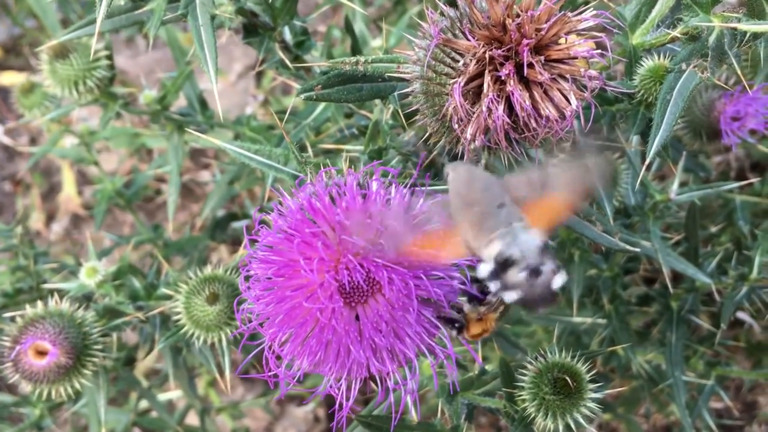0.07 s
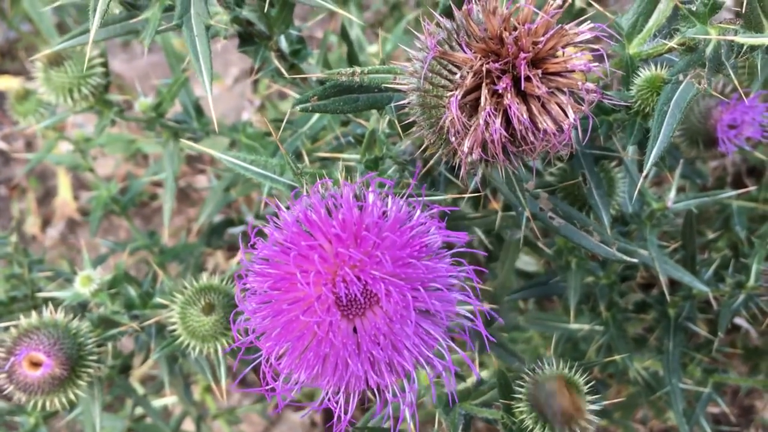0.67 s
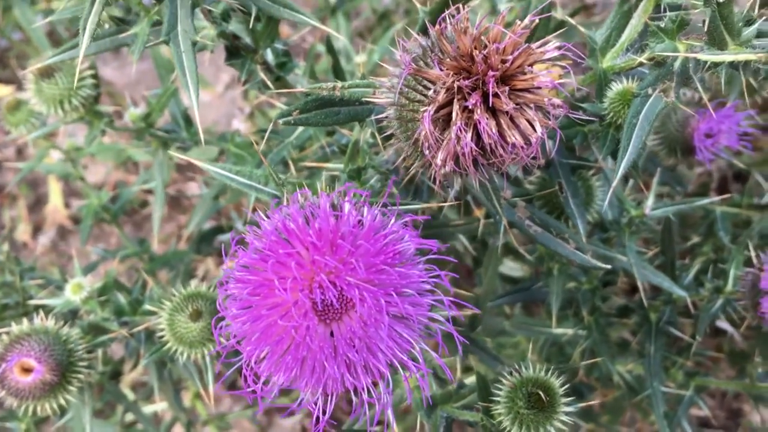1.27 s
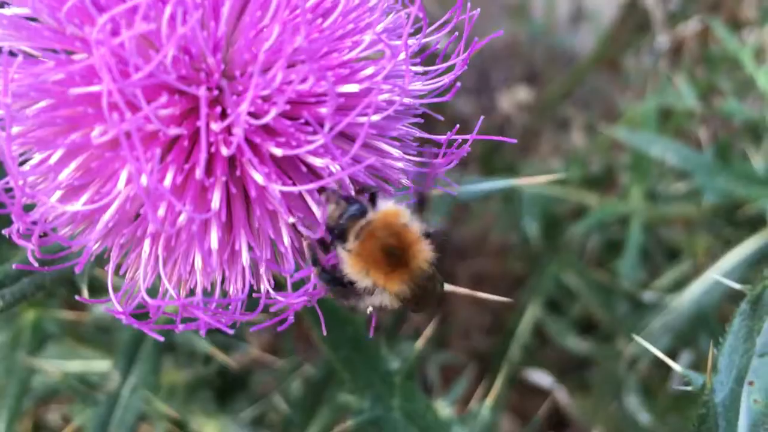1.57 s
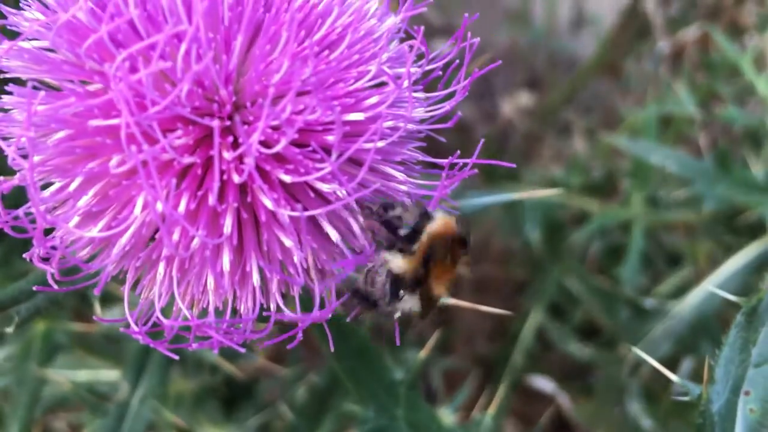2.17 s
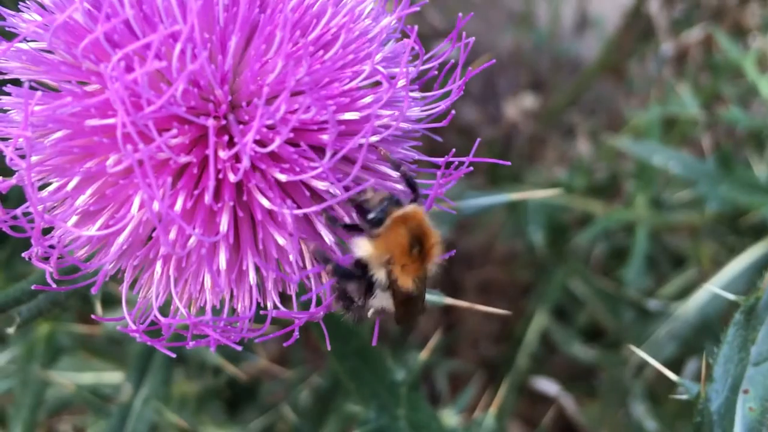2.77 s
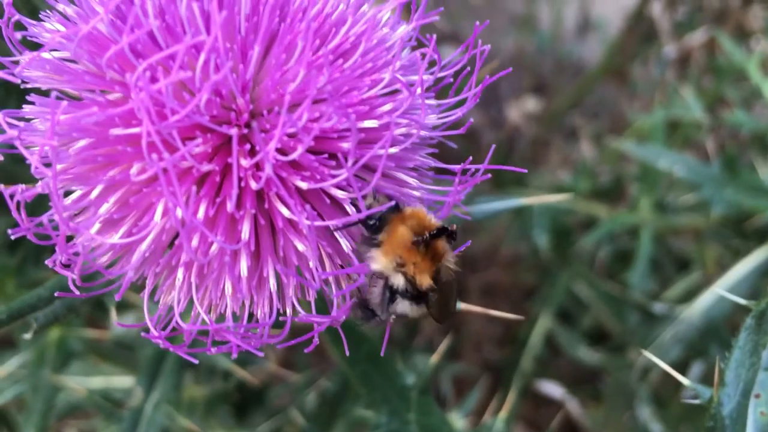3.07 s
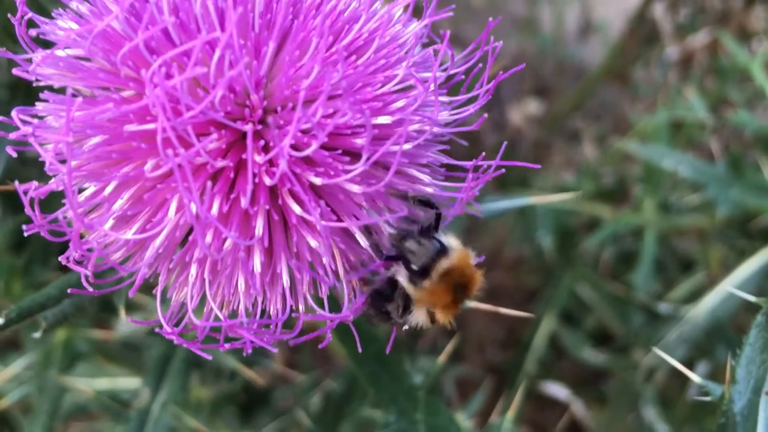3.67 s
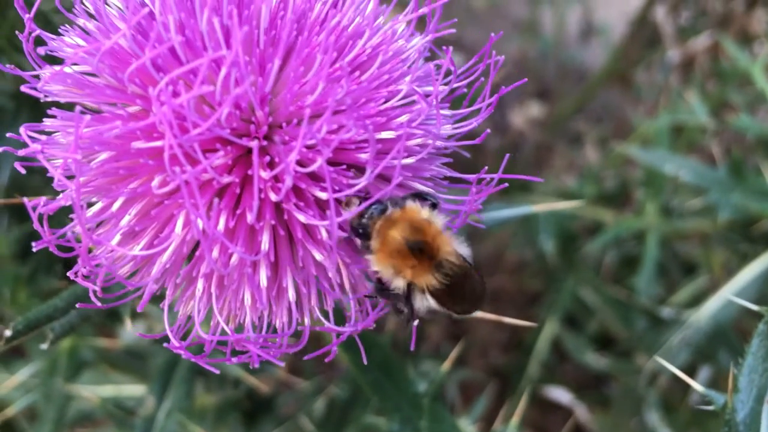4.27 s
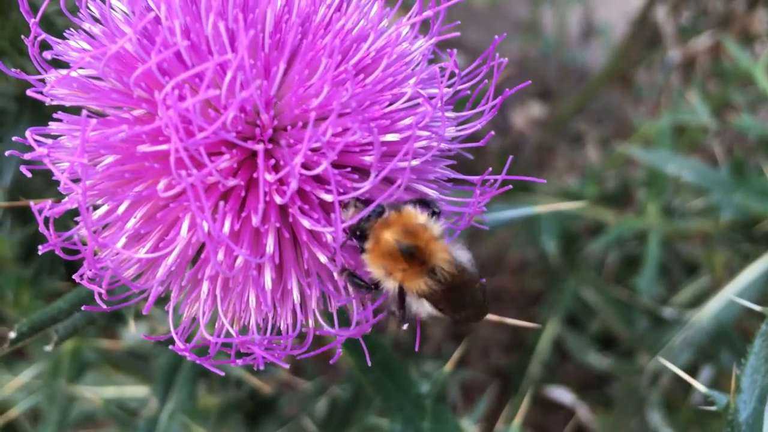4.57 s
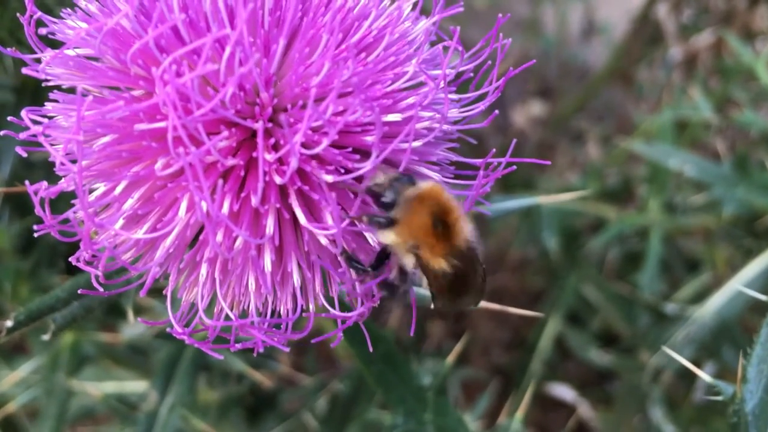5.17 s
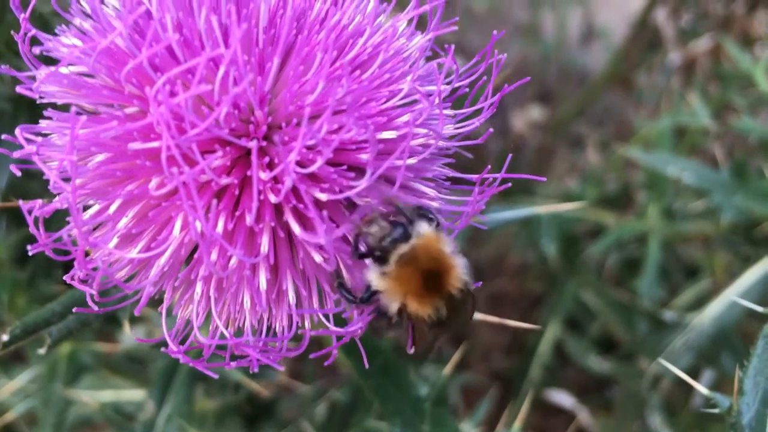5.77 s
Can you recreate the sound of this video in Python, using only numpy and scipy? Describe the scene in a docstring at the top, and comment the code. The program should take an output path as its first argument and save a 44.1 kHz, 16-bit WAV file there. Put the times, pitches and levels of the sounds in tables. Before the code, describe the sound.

Low, fluttering wingbeats of a hovering moth fade away, leaving bees humming and buzzing by, with thin, distant bird whistles.

```python
"""Wings throb and tick close by: a hawk moth hovers at a thistle, brushes the dry plant and leaves.
Each wing stroke pushes a pulse of air. A bee buzzes past, another comes near at the end,
and more hum among the flowers, their wingbeats drifting in and out of step.
A small bird whistles thinly far off over faint outdoor air, and very high ticks come now and then.
The sound drops out once for an instant."""
import sys
import numpy as np
from scipy import signal
from scipy.fft import rfft, irfft, next_fast_len
from scipy.io import wavfile
from scipy.ndimage import uniform_filter1d

SR = 44100
rng = np.random.default_rng(int(sys.argv[2]) if len(sys.argv) > 2 else 0)


def put_to_file(sound):
    """Save the sound as 16-bit audio at rate SR, in the file named by the first command-line argument."""
    columns = np.atleast_2d(sound).T  # one column per channel
    safe = np.clip(columns, -1, 1)
    whole_steps = np.round(safe * 32767)
    wavfile.write(sys.argv[1], SR, whole_steps.astype(np.int16))


N = 260631
TIME = np.arange(N) / SR
DROPOUT_START_S, DROPOUT_END_S = 1.5825, 1.607


def from_db(db):
    """Turn decibels (dB) into a number to multiply a sound by."""
    return 10 ** (np.asarray(db) / 20)


def unit(x):
    """Scale a signal so that its average strength (rms) is 1."""
    return x / np.sqrt(np.mean(x ** 2))


def curves(table):
    """Join a table's rows with straight lines in time: one curve for each column after the first."""
    times, *columns = np.transpose(table)
    return [np.interp(TIME, times, column) for column in columns]


def bell(peak_s, width_s):
    """A smooth rise to 1 and back."""
    return np.exp(-((TIME - peak_s) / width_s) ** 2)


def wander(rate):
    """A smooth random wobble of strength 1, drawn from `rate` new values a second."""
    held = np.repeat(rng.standard_normal(int(rate * N / SR) + 3), 8)
    smooth = uniform_filter1d(uniform_filter1d(held, size=8), size=8)
    return np.interp(TIME * rate, np.arange(len(smooth)) / 8, unit(smooth))


def colour(x, points):
    """Make some frequencies stronger and others weaker; white noise keeps its overall power."""
    hz, db = np.transpose(points)
    size = next_fast_len(N + SR // 10, real=True)
    log_hz = np.log(np.fft.rfftfreq(size, 1 / SR) + 1)
    gain = from_db(np.interp(log_hz, np.log(hz), db))
    return irfft(rfft(x, size) * unit(gain), size)[:N]


def noise(points):
    """Coloured noise of strength about 1."""
    return colour(rng.standard_normal(N), points)


def phase_of(hz):
    """How far a changing pitch has turned through its cycles, in radians."""
    return 2 * np.pi * np.cumsum(hz) / SR


def tone(phase):
    """A pure tone of strength 1."""
    return np.sqrt(2) * np.cos(phase)


def bursts(events, decay_s):
    """Noise that jumps up at each event and dies away."""
    envelope = np.zeros(N)
    for start_s, db in events:
        start = int(start_s * SR)
        envelope[start:] += from_db(db) * np.exp(-TIME[:N - start] / decay_s)
    return envelope * rng.standard_normal(N)


def air(rumble_db=-71, hiss_db=-84):
    """Outdoor air rumbles faintly, swaying in level, under an even hiss."""
    # The colours of the two noises. Each row: frequency in Hz, relative level in dB.
    rumble_colour = [(20, -19), (35, -7), (60, 3.5), (110, -3.5), (190, -9.5), (260, -4), (450, -6.5),
                     (800, -14), (1300, -14), (2000, -17.5), (3700, -19.5), (4900, -27), (5600, -23.5),
                     (10400, -26)]
    hiss_colour = [(9000, -23), (10500, -36), (11300, 8.5), (16000, 5.5)]
    rumble = from_db(rumble_db + 0.66 * wander(4.45)) * noise(rumble_colour)
    return rumble + from_db(hiss_db) * noise(hiss_colour)


def high_ticks(gain_db=-5):
    """Faint, very high ticks come now and then, perhaps from insects."""
    # Each row: start in seconds, relative level in dB.
    tick_events = [(1.708, -53), (2.1256, -60), (3.7249, -56), (3.858, -60), (4.133, -61)]
    # Each row: frequency in Hz, relative level in dB.
    tick_colour = [(3000, -33), (9500, -21), (11500, 5), (14000, 9), (16000, 4)]
    return colour(from_db(gain_db) * bursts(tick_events, decay_s=0.002), tick_colour)


def bird(warble=0.01, echo_decay_s=0.031, gain_db=-3):
    """A far bird's thin, sliding whistles are smeared as they scatter among the plants."""
    # Each row: start and length in seconds, first and last pitch in Hz, relative level in dB.
    notes = [(1.15, 0.13, 7540, 7900, -88), (1.52, 0.069, 8500, 8510, -73.5), (1.534, .06, 7520, 7570, -86),
             (2.418, 0.12, 8750, 8750, -90), (2.841, .13, 8540, 8050, -85), (3.537, 0.16, 8430, 8400, -76),
             (3.57, 0.11, 7480, 7250, -82), (3.908, 0.067, 8640, 7940, -77),
             (3.934, 0.094, 8160, 7960, -78), (4.307, .05, 8100, 7640, -79.5), (4.34, 0.2, 7800, 7830, -88)]
    song = np.zeros(N)
    for start, length, first_hz, last_hz, db in notes:
        progress = np.clip((TIME - start) / length, 0, 1)
        hz = (first_hz + (last_hz - first_hz) * progress) * (1 + warble * wander(250))
        song += from_db(db) * np.sqrt(4 * progress * (1 - progress)) * tone(phase_of(hz))
    tail = rng.standard_normal(SR // 2) * np.exp(-TIME[:SR // 2] / echo_decay_s)
    echo = signal.fftconvolve(song, tail / np.linalg.norm(tail))[:N]
    # the dropout cuts off a call and its echo
    heard = (TIME < DROPOUT_START_S) | (TIME > DROPOUT_END_S + 0.5)
    return from_db(gain_db) * (song + echo) * heard


def distant_buzz(buzz_db=-58.5, drift=0.012):
    """The overtones of distant bees spread apart above their hum, over a faint steady drone."""
    # The wingbeat of each bee in Hz.
    wingbeats = [168, 173.4, 174.6, 179.6]
    # Each row: multiple of the wingbeat, relative level in dB.
    overtones = [(2, -23), (3, -26), (4, -27.5), (5, -36.5), (6, -32.5), (7, -33.5), (8, -38), (9, -38),
                 (10, -35.5)]
    # Each row: pitch in Hz, level in dB.
    drone_tones = [(100, -89), (314, -84), (942, -92.5), (1256, -91)]
    buzz, drone = 0, 0
    for hz in wingbeats:
        phase = phase_of(hz * (1 + drift * wander(5) + 0.00498 * wander(50)))
        buzz += sum(from_db(db + 3.8 * wander(9)) * tone(k * phase) for k, db in overtones)
    for hz, db in drone_tones:
        drone += from_db(db + 4 * wander(4.9)) * tone(phase_of(hz * (1 + 0.004 * wander(10))))
    return from_db(buzz_db) * buzz / np.sqrt(len(wingbeats)) + drone


def distant_hum(swell_gain_db=-0.5, swell_edge_s=0.014, murmur_db=-70, drift=0.01517):
    """The wingbeats of distant bees pulse against each other and swell into one tone when in step."""
    # The wingbeat of each bee in Hz.
    wingbeats = [153.6, 159.3, 163.1, 165.6, 170.9]
    # The pulsing hum. Each row: time in seconds, level in dB.
    hum_levels = [(0, -53.5), (.8, -54), (1.7, -61.5), (2.7, -61), (4.6, -59), (5.9, -62.5)]
    # Moments in step. Each row: start and length in seconds, relative level in dB, wingbeat in Hz.
    swell_events = [(1.049, 0.087, -52, 162.9), (1.188, 0.16, -51.5, 160.4), (1.4, 0.042, -51, 165.3),
                    (1.479, 0.023, -53.5, 154.7), (1.78, 0.044, -53, 165.7), (1.91, 0.032, -54, 160.3),
                    (2.293, 0.056, -53, 161.3), (2.969, 0.024, -55, 159.1), (3.094, 0.04, -52.5, 168.7),
                    (3.153, 0.072, -50, 164.6), (3.355, 0.031, -53, 162), (3.869, 0.05, -52.5, 161.8),
                    (4.14, 0.052, -50, 162.3), (4.38, 0.053, -52, 163), (4.484, 0.025, -54.5, 164.8),
                    (4.55, 0.03, -54.5, 169), (4.815, 0.03, -55, 168.2), (4.903, 0.026, -53.5, 168.0),
                    (5.159, 0.057, -51, 166.6), (5.545, 0.027, -54.5, 163.4)]
    # The blur of the farthest bees. Each row: frequency in Hz, relative level in dB.
    murmur_colour = [(90, -30), (135, -7.5), (155, -8), (185, -0.5), (205, -7.5), (240, -19.5), (400, -48),
                     (1000, -70)]
    chorus = sum(tone(phase_of(hz * (1 + drift * wander(6)))) for hz in wingbeats)
    pulsing = from_db(curves(hum_levels)[0]) * unit(chorus)
    swells, in_step = 0, 0
    for start, length, db, hz in swell_events:
        shape = bell(start + length / 2, length / 2 + swell_edge_s)
        phase = 2 * np.pi * hz * TIME + rng.uniform(0, 2 * np.pi)
        swells += from_db(db + swell_gain_db) * shape * tone(phase)
        in_step = np.maximum(in_step, shape)
    return (1 - in_step) * pulsing + swells + from_db(murmur_db) * noise(murmur_colour)


def bee(flight, harmonics, low_tone_db, rasp_db, wash_db, flutter_db, jitter, swerve_jitter, blur):
    """Wings make harmonics (multiples of the wingbeat), rough in a swerve, and a wash of chopped air."""
    # The chopped air. Each row: frequency in Hz, relative level in dB.
    wash_colour = [(100, -22), (350, 5), (900, -3.5), (1600, -4.5), (2000, -19), (3000, -15), (4200, -15.5),
                   (4900, -20), (9000, -17.5), (15000, -15.5)]
    full_swerve_hz_per_s, fade_s = 220, 0.048
    hz, body_db, buzz_db = curves(flight)
    # a swerve shows as a quick change of wingbeat
    hz_per_s = uniform_filter1d(np.abs(np.gradient(hz)) * SR, size=2400)
    swerve = np.clip(hz_per_s / full_swerve_hz_per_s, 0, 1)
    phase = phase_of(hz * (1 + (jitter + swerve_jitter * swerve ** 2) * wander(70)))
    multiples = np.arange(3, 33)
    rasp = 0
    for k, db in zip(multiples, np.interp(multiples, *np.transpose(harmonics))):
        rasp += from_db(db + flutter_db * wander(7)) * tone(k * phase + rng.uniform(0, 2 * np.pi))
    # with distance the rasp sinks faster than the wash
    rasp = unit(rasp) * from_db(blur * (buzz_db - buzz_db.max()))
    wash = (1 + swerve) * (1 + 0.65 * np.cos(phase)) * noise(wash_colour)
    buzz = from_db(rasp_db) * rasp + from_db(wash_db) * wash
    body = from_db(low_tone_db) * tone(phase) + tone(2 * phase)
    inside_flight_s = np.minimum(TIME - flight[0][0], flight[-1][0] - TIME)
    fade = np.clip(1 + inside_flight_s / fade_s, 0, 1)
    return (from_db(body_db) * body + from_db(buzz_db) * buzz) * fade


def passing_bee():
    """A bee flies past early on, its pitch sagging as it goes."""
    # Each row: time in seconds, wingbeat in Hz, second harmonic in dB, relative buzz level in dB.
    flight = [(0.63, 164.1, -59, -71), (0.652, 165.8, -58.5, -64.5), (0.754, 159.9, -61.5, -66),
              (0.868, 157.8, -55.5, -64), (1.04, 150.7, -62.5, -67.5), (1.33, 151, -64, -71.5),
              (1.37, 156.1, -61, -73), (1.458, 151.7, -69.5, -72.5), (1.58, 156, -67, -72.5)]
    # Its rasp. Each row: multiple of the wingbeat, relative level in dB.
    harmonics = [(3, -3.5), (4, 1), (5, 3), (6, -0.5), (7, -7.5), (8, -2.5), (9, -4.5), (10, -3.5),
                 (11, -12.5), (13, -16.5), (16, -14.5), (18, -23), (24, -26), (29, -24), (32, -34)]
    return bee(flight, harmonics, low_tone_db=-4.5, rasp_db=1.5, wash_db=-4, flutter_db=2.8,
               jitter=0.0025, swerve_jitter=0.0118, blur=0.5)


def swerving_bee():
    """A bee comes near at the end and swerves twice, its pitch dipping each time."""
    # Each row: time in seconds, wingbeat in Hz, second harmonic in dB, relative buzz level in dB.
    flight = [(4.7, 174.3, -87, -89), (4.746, 179.2, -79, -90), (4.922, 176.7, -70, -89),
              (4.976, 179.7, -63, -75), (5.006, 176.9, -83, -94), (5.154, 153.6, -71, -82),
              (5.228, 180.7, -58.5, -69), (5.298, 174.0, -60.5, -67.5), (5.42, 174.7, -71, -71.5),
              (5.562, 172.2, -65.5, -71.5), (5.612, 151.7, -88, -80), (5.646, 163.7, -71, -71),
              (5.744, 180.6, -71, -74.5), (5.91, 174.7, -69.5, -72.5)]
    # Its rasp. Each row: multiple of the wingbeat, relative level in dB.
    harmonics = [(3, 2), (4, -0.5), (5, 3.5), (6, 1.5), (7, 0), (8, -3), (9, -2), (10, -3.5), (11, -12),
                 (14, -17), (26, -35), (32, -38)]
    return bee(flight, harmonics, low_tone_db=-3, rasp_db=2, wash_db=-8, flutter_db=2.5,
               jitter=0.002, swerve_jitter=0.014, blur=0.12)


def dry_plant(brush_db=-5, grain_db=3):
    """The dry thistle rustles and crackles under the moth's wings."""
    # Each row: peak time in seconds, relative level in dB, rise and fall times in seconds.
    rustles = [(.38, -74, 0.96, 0.14), (.675, -56.5, 0.026, 0.013), (.8, -69.5, .08, 0.39)]
    # Wing touches. Each row: start in seconds, relative level in dB.
    brush_events = [(.639, -52), (.645, -41), (.651, -49), (.656, -53), (.6655, -33), (.6705, -36),
                    (.678, -46), (.6835, -35), (.690, -38), (.834, -40)]
    # Each row: frequency in Hz, relative level in dB.
    rustle_colour = [(600, -40), (1500, -15), (3300, -14), (4900, -15.5), (6000, -13), (10000, -7),
                     (12000, -3), (15500, -1)]
    shapes = [from_db(db) * np.exp(np.minimum((TIME - peak) / rise, (peak - TIME) / fall))
              for peak, db, rise, fall in rustles]
    stir = np.linalg.norm(shapes, axis=0) * (TIME < DROPOUT_START_S)
    rustle = rng.standard_normal(N) * stir * from_db(grain_db * wander(500))
    brushes = from_db(brush_db) * bursts(brush_events, decay_s=0.00086)
    return colour(rustle + brushes, rustle_colour)


def moth(pulse_db=-1.9, overtone_db=1.5, wash_db=-21, tick_db=-2, jitter=0.012, roughness=0.66):
    """Wings beat faster and harder in spurts; each stroke pushes air, churns it and makes a dry tick."""
    # Each row: peak time in seconds, half-length in seconds before widening, top wingbeat in Hz,
    # then the relative levels in dB of the stroke, the overtones and the ticks.
    spurts = [(0.022, 0.065, 64.26, -40.5, -57.5, -72), (0.194, 0.097, 63.5, -42, -57, -70.5),
              (0.267, 0.029, 69.4, -40, -55, -81), (0.335, .02, 58, -49, -64, -72.5),
              (.39, 0.053, 74.8, -35, -55.5, -75.5), (0.479, 0.053, 61.1, -39, -60.5, -74),
              (.612, .036, 71.87, -38, -52, -70.5), (0.683, .03, 58.83, -48, -63, -73),
              (0.749, .035, 65.7, -38.5, -56.5, -72), (0.833, 0.0567, 70.1, -39.5, -58, -71.5),
              (1.057, 0.082, 69.8, -51.5, -69, -92), (1.272, 0.04, 71.8, -47.5, -64.5, -86)]
    # Each row: multiple of the wingbeat, relative level in dB.
    overtone_levels = [(2, 6), (3, 1), (4, -7.5), (5, -14.5), (6, -22.5)]
    # The churned air and the ticks. Each row: frequency in Hz, relative level in dB.
    wash_colour = [(40, -28), (95, 23), (200, 14.5), (330, 13.5), (480, -4), (700, 3), (1200, -1.5),
                   (2000, -16.5), (3500, -17), (4800, -24), (6000, -17.5), (15000, -48)]
    tick_colour = [(500, -7), (2500, -0.5), (4900, -3), (6000, 1), (10400, -1.5), (13000, 1.5), (16000, -1)]
    coasting_hz, widening, tick_decay_s = 55.8, 1.15, 0.00038
    push_lag_s = 0.016  # the air pushes hardest just after the effort peaks
    peaks, widths, top_hz, strokes_db, overtones_db, ticks_db = np.transpose(spurts)[:, :, None]
    effort = bell(peaks, widths * widening)
    push = bell(peaks + push_lag_s, widths * widening)
    # overlapping spurts add their power
    stroke_gain = np.linalg.norm(from_db(strokes_db) * push, axis=0)
    overtone_gain = np.linalg.norm(from_db(overtones_db) * effort, axis=0)
    tick_gain = np.linalg.norm(from_db(ticks_db) * effort, axis=0)
    beat_hz = coasting_hz + np.max((top_hz - coasting_hz) * effort, axis=0)
    phase = phase_of(beat_hz * (1 + jitter * wander(60.4)))
    overtones = 0
    for k, db in overtone_levels:
        level = from_db(db + 2.4 * wander(45))
        overtones += level * tone(k * phase + np.pi / 2 + roughness * wander(40))
    wash = (1 + 0.5 * np.cos(phase)) * noise(wash_colour)
    strokes = stroke_gain * (from_db(pulse_db) * tone(phase) + from_db(wash_db) * wash)
    # one short scrape each wingbeat, just ahead of the pulse of air
    since_tick_s = (phase + np.pi / 4) / (2 * np.pi) % 1 / beat_hz
    ticks = unit(np.exp(-since_tick_s / tick_decay_s) * rng.standard_normal(N))
    ticks *= tick_gain * from_db(tick_db + 2 * wander(48))
    return strokes + from_db(overtone_db) * overtone_gain * overtones + colour(ticks, tick_colour)


def scene():
    """Add all the sources into one channel."""
    nearby = moth() + dry_plant() + high_ticks() + passing_bee() + swerving_bee()
    return (nearby + distant_hum() + distant_buzz() + bird() + air())[None]


def record(dry):
    """The sound fades in quickly and drops out for an instant; the highest treble is cut steeply."""
    fade_in_s, dropout_db, cutoff_hz = 0.005, -35.5, 15800
    dropout = (TIME > DROPOUT_START_S) & (TIME < DROPOUT_END_S)
    gain = uniform_filter1d(np.where(dropout, from_db(dropout_db), 1.0), size=24)
    gain *= np.minimum(TIME / fade_in_s, 1)
    low_pass = signal.ellip(10, 0.2, 70, cutoff_hz, fs=SR, output="sos")
    return signal.sosfilt(low_pass, dry * gain)


dry = scene()
out = record(dry)
put_to_file(out)
```